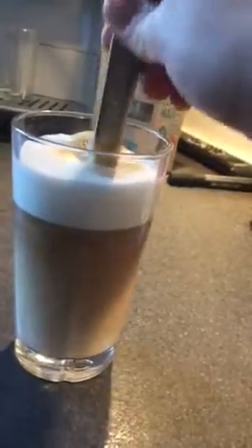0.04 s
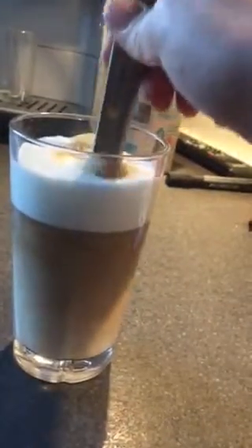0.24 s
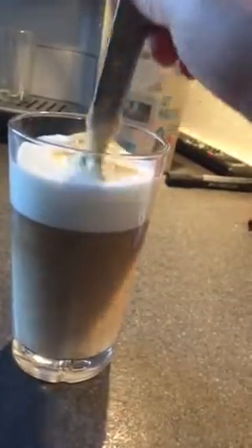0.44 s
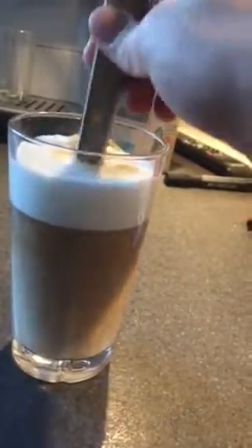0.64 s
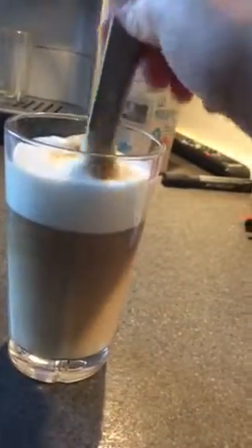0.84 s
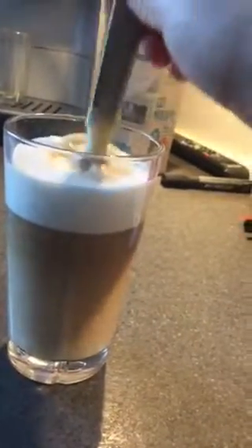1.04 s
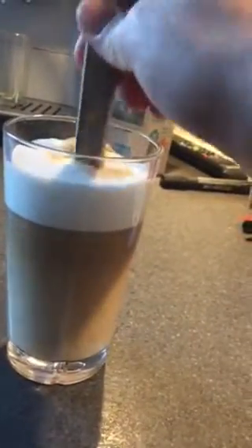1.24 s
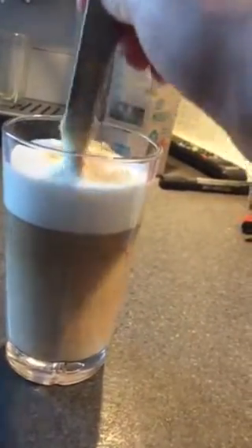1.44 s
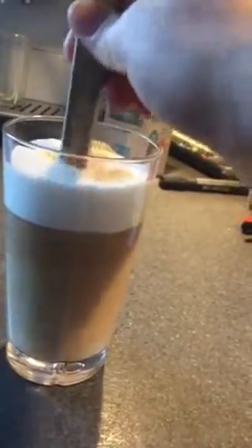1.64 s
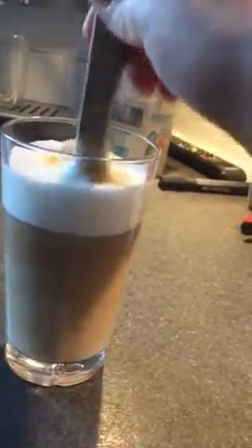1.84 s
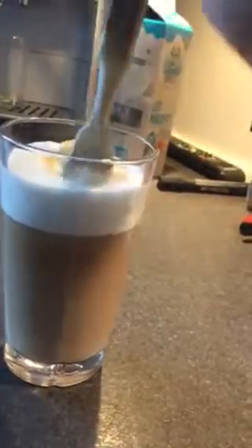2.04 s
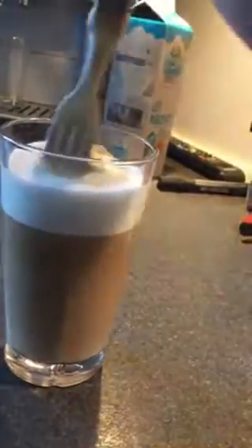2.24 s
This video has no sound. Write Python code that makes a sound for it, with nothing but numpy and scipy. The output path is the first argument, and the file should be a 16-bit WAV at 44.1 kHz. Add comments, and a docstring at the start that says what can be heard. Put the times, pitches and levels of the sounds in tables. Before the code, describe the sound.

A metal fork clinks unevenly against a full glass as it stirs milky coffee. Two dull thuds pass into the counter early on, while the drink softly sloshes and foam swishes. Heard close in a small, quiet kitchen.

```python
"""Short, damped clinks over a soft slosh: a steel fork stirs a tall glass of milky coffee, close by.
Each contact rings the glass briefly, for drink and foam damp it.
Twice the fork hits the bottom and the counter thuds.
Between the clinks the drink sloshes and the foam swishes; a small quiet kitchen answers."""
import sys
import numpy as np
from scipy import signal
from scipy.fft import rfft, irfft
from scipy.io import wavfile

SR = 44100
rng = np.random.default_rng(int(sys.argv[2]) if len(sys.argv) > 2 else 0)


def store_wav(level_fs):
    """Save 16-bit WAV to argv[1]."""
    pcm = np.round(np.clip(np.atleast_2d(level_fs), -1, 1) * 32767)
    wavfile.write(sys.argv[1], SR, pcm.T.astype(np.int16))


N = 101429
T = np.arange(N) / SR
HZ = np.maximum(np.fft.rfftfreq(N, 1 / SR), 1)

# Fork contacts; the place touched sets tink pitch and register levels:
# t/s, tink f/Hz, then level/dB of tink, knock, hollow, wall, ring, ping, clatter, scrape, tick
CONTACTS = [(0.0448, 1640, -38, -55, -53, -49.5, -51.5, -49.5, -44, -51, -56),
            (0.2479, 2106, -26, -41.5, -51, -45, -44.5, -61, -52, -48.5, -53.5),
            (.2625, 1990, -36, -80, -80, -63, -71, -58.5, -78, -58, -69),
            (0.3682, 2746, -35, -54.5, -52, -60, -52, -52, -57.5, -49, -55.5),
            (.411, 2360, -39, -72, -58.5, -80, -73, -66, -62.5, -70, -61),
            (0.4271, 2270, -40, -69, -59, -72, -59.5, -65, -65, -64.5, -64),
            (0.6171, 1933, -29.5, -48, -45.5, -46, -38.5, -46.5, -44.5, -40.5, -49),
            (0.8126, 2150, -41, -53, -57, -56.5, -46, -62, -80, -43.5, -63),
            (.8215, 2130, -49, -60, -52, -61, -57, -66, -49.5, -75, -76),
            (0.9109, 2437, -43.5, -60, -65, -69.5, -61, -64, -61.5, -63, -60),
            (1.1806, 2526, -23.5, -51, -47, -37, -38.5, -36, -42, -39, -46),
            (1.4231, 2660, -25.5, -49.5, -52, -60.5, -52, -44, -54, -51, -53.5),
            (1.4583, 2654, -32.5, -66, -59, -54, -46, -45, -49.5, -52, -51.5),
            (1.4769, 2360, -38, -59.5, -76, -81, -61, -79, -62, -68, -61),
            (1.736, 1280, -37.5, -60.5, -63.5, -51, -58.5, -69, -59, -54.5, -68),
            (1.8116, 2490, -43.5, -63, -66, -71, -59.5, -77, -51.5, -77, -72),
            (1.8976, 2450, -28.5, -56, -51, -65, -47, -52.5, -53.5, -54.5, -53.5),
            (1.9217, 2365, -37, -97, -68, -67, -67, -63, -65, -60.5, -68)]


def undb(db):
    """Decibels to gain."""
    return 10 ** (np.asarray(db) / 20)


def at_hz(hz, points_hz, values):
    """Interpolate over log frequency."""
    return np.interp(np.log(hz), np.log(points_hz), values)


def envelope(table):
    """Gain over time from rows of t/s, level/dB."""
    return undb(np.interp(T, *np.array(table).T))


def fade(t60_s):
    """Exponential decay."""
    return np.exp(-np.log(1000) * T / t60_s)


def rise(tau_s):
    """Exponential onset."""
    return 1 - np.exp(-T / tau_s)


def ring(hz, t60_s):
    """One damped mode."""
    return np.sin(2 * np.pi * hz * T) * fade(t60_s)


def noise(gain):
    """White noise weighted per frequency bin."""
    return irfft(rfft(rng.standard_normal(N)) * gain, N)


def coloured(table):
    """Unit-rms noise from rows of f/Hz, density/dB."""
    x = noise(undb(at_hz(HZ, *np.array(table).T)))
    return x / x.std()


def cut(x, hz, kind, order=4):
    """Butterworth high-pass or low-pass."""
    return signal.sosfilt(signal.butter(order, hz, kind, fs=SR, output="sos"), x)


def add(out, x, start_s):
    """Mix x into out from start_s."""
    i = int(start_s * SR)
    out[i:] += x[:N - i]


def hush():
    """Steady, bass-heavy room noise."""
    # f/Hz, density/dB
    spectrum = [(18, -18), (30, -1.5), (73, 5.5), (153, -8.5), (221, -10.5), (280, -9.5), (721, -12.5),
                (937, -15), (1100, -13.5), (1190, -17.5), (1460, -18), (2120, -15.5), (16000, -25.5)]
    return undb(-71) * coloured(spectrum)


def kitchen(x):
    """Quick reflections off the counter and things on it, then the room's short tail."""
    # Reverberation bands: f/Hz, level/dB, t60/s
    bands = [(160, -8.5, 0.88), (500, -8, 0.29), (2030, -7.5, 0.16), (5240, -10, 0.21), (12100, -11, 0.16)]
    response = np.zeros(N)
    near = rng.standard_normal(N) * fade(t60_s=0.048)
    add(response, undb(-8.5) * near / np.linalg.norm(near), start_s=0.0035)
    centres_hz = [row[0] for row in bands]
    for share, (_, db, t60_s) in zip(np.eye(len(bands)), bands):
        band = noise(np.sqrt(at_hz(HZ, centres_hz, share)))
        decay = fade(t60_s)
        add(response, undb(db) * band * decay / np.linalg.norm(decay), start_s=0.011)
    return signal.fftconvolve(x, response)[:N]


def foam():
    """The tines swish through the foam."""
    # Swish: t/s, level/dB
    levels = [(0, -76.5), (.1, -67.5), (.18, -81.5), (.55, -77), (.7, -65.5), (.77, -72.5), (.94, -71),
              (.98, -62.5), (1.02, -71.5), (1.15, -67), (1.27, -63.5), (1.32, -53), (1.36, -59), (1.4, -69),
              (1.6, -80), (2.3, -88)]
    # f/Hz, density/dB
    spectrum = [(200, -19), (600, -14.5), (1100, -0.5), (1800, 1), (2500, 2.5), (3500, -5.5), (6000, -6.5),
                (8000, -11.5), (12000, -17), (16000, -21)]
    return envelope(levels) * coloured(spectrum)


def slosh():
    """The stirred drink gulps low."""
    # Gulps: t/s, level/dB
    levels = [(0, -73.5), (.2, -76.5), (.4, -58.5), (.55, -89), (.61, -64), (.64, -51), (.69, -53.5),
              (.72, -65), (.95, -64), (1.03, -73), (1.11, -59), (1.16, -69), (1.21, -49), (1.26, -56.5),
              (1.3, -66.5), (1.39, -76), (1.45, -60), (1.55, -70.5), (1.62, -64.5), (1.74, -78),
              (1.85, -69), (1.98, -68.5), (2.04, -60.5), (2.06, -73), (2.3, -80.5)]
    # f/Hz, density/dB
    spectrum = [(40, -29), (60, -13.5), (80, -30), (100, -13), (120, 1), (145, -10.5), (190, -18),
                (260, -20), (340, -10), (450, -26.5), (900, -68)]
    return envelope(levels) * cut(coloured(spectrum), hz=860, kind="lowpass")


def thuds():
    """A blow on the bottom passes through the glass into the counter, which booms and rumbles."""
    # Fork landings: t/s, level/dB
    blows = [(0.2491, -31), (0.814, -34.5)]
    # f/Hz, level/dB, t60/s
    counter_modes = [(118, -9.5, 0.22), (155, -8.5, .27), (210, -9.5, 0.23), (273.8, -6, 0.23),
                     (340, -5, .33), (393.4, -3.5, 0.052)]
    # f/Hz, density/dB
    rumble_spectrum = [(50, -38), (110, -9), (200, -1), (330, 1), (480, -24), (1200, -22), (4000, -63)]
    boom = sum((-1) ** k * undb(db) * ring(hz, t60_s) for k, (hz, db, t60_s) in enumerate(counter_modes))
    glass_rocking = undb(6.5) * ring(hz=314, t60_s=0.038)
    out = np.zeros(N)
    for start_s, db in blows:
        rumble = undb(-3.5) * coloured(rumble_spectrum) * fade(t60_s=0.23)
        add(out, undb(db) * (boom + glass_rocking + rumble) * rise(tau_s=0.0015), start_s)
    return cut(out, hz=79, kind="highpass")


def tinks():
    """Each contact opens with a very short note, pitched by where the fork touches."""
    out = np.zeros(N)
    for start_s, hz, db, *_ in CONTACTS:
        add(out, undb(db) * ring(hz, t60_s=0.021) * rise(tau_s=0.00046), start_s)
    return out


def steel_clatter(register_db):
    """The fork's dense clatter at one contact; the treble dies first."""
    # f/Hz, density/dB
    spectrum = [(200, -24), (700, -9.5), (1000, -14), (1500, -1), (2100, 6.5), (2700, -9.5), (3200, -3.5),
                (4000, 1), (4700, -0.5), (5500, 0), (6600, 1), (7600, -10), (8600, -1), (10000, -1),
                (12500, 5), (16000, -6.5)]
    # Wall, ring, clatter, scrape, tick: f/Hz
    registers_hz = [1600, 2500, 4000, 7000, 13000]
    gain = undb(16 + at_hz(HZ, *np.array(spectrum).T) + at_hz(HZ, registers_hz, register_db))
    treble_share = np.clip((HZ - 3000) / 6000, 0, 1)
    body = noise(gain * np.sqrt(1 - treble_share)) * fade(t60_s=0.029)
    treble = noise(gain * np.sqrt(treble_share)) * fade(t60_s=0.011)
    return (body + treble) * rise(tau_s=0.00014)


def glass_mode(hz, t60_s):
    """A mode builds up, is quickly damped and lingers faintly once the fork has sprung away."""
    build_cycles = 0.93
    after_ring = undb(-21) * ring(hz, t60_s=0.22)
    return (ring(hz, t60_s) + after_ring) * rise(build_cycles / hz)


def glass_ring(register_db):
    """One contact rings the filled glass; the low knock shifts with the place touched."""
    # Modes with the fork against the glass: f/Hz, level/dB, t60/s
    modes = [(259.7, 2, 0.094), (336.3, 6.5, 0.06), (614, -6.5, 0.075), (713.5, -2.5, 0.13),
             (1258, -0.5, .04), (1440.7, 1.5, 0.052), (1763, -2, 0.032), (2090, 2.5, 0.023),
             (2240, 1, 0.041), (2360, 1.5, 0.027), (2584, -1, 0.023), (2835, -1, 0.023), (5320, 2.5, 0.021),
             (5460, -1, 0.025), (5907, -3, 0.025)]
    # Knock, hollow, wall, ring, ping: f/Hz
    registers_hz = [340, 650, 1600, 2500, 5400]
    mode_hz, mode_db, _ = np.array(modes).T
    waves = np.array([glass_mode(hz, t60_s) for hz, _, t60_s in modes])
    scatter_db = 0.87 * rng.standard_normal(len(modes))
    gain = undb(3 + mode_db + at_hz(mode_hz, registers_hz, register_db) + scatter_db)
    gain *= np.sign(rng.standard_normal(len(modes)))
    low = mode_hz < 500
    pitch_ratio = 1 + 0.031 * rng.standard_normal()
    knock = np.interp(T * pitch_ratio, T, gain[low] @ waves[low])
    return knock + gain[~low] @ waves[~low]


def clinks():
    """Every contact excites both glass and fork."""
    out = np.zeros(N)
    for start_s, _, _, knock, hollow, wall, rung, ping, clatter, scrape, tick in CONTACTS:
        glass = glass_ring([knock, hollow, wall, rung, ping])
        steel = steel_clatter([wall, rung, clatter, scrape, tick])
        add(out, glass + steel, start_s)
    return out


def scene():
    """Clinks and their reflections over thuds, drink and hush; mono."""
    strikes, notes = clinks(), tinks()
    # A tink comes from a small spot and excites the room less than the whole glass.
    room = kitchen(strikes + undb(-7.5) * notes)
    return (strikes + notes + room + thuds() + slosh() + foam() + hush())[None]


def record(dry):
    """Thin the deepest bass; cut the top steeply."""
    top_hz = 16000
    thin = cut(dry, hz=47, kind="highpass", order=2)
    return signal.sosfilt(signal.ellip(10, 0.2, 70, top_hz, fs=SR, output="sos"), thin)


dry = scene()
out = record(dry)
store_wav(out)
```